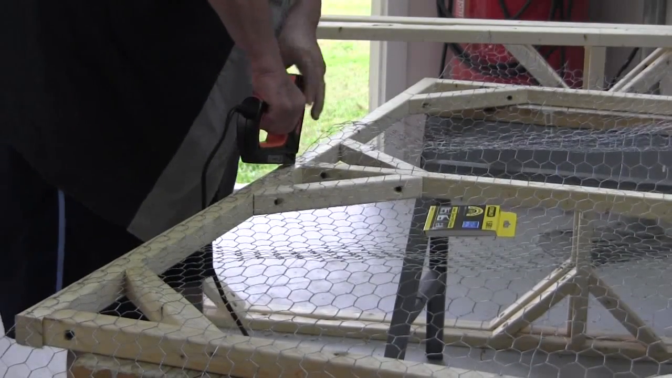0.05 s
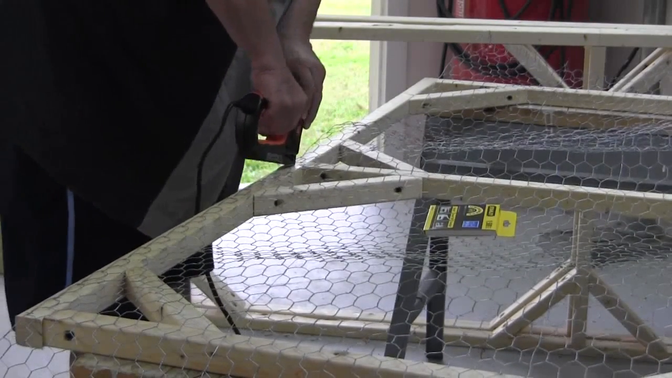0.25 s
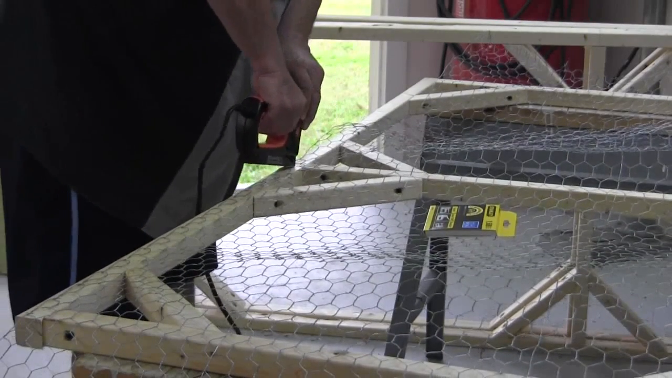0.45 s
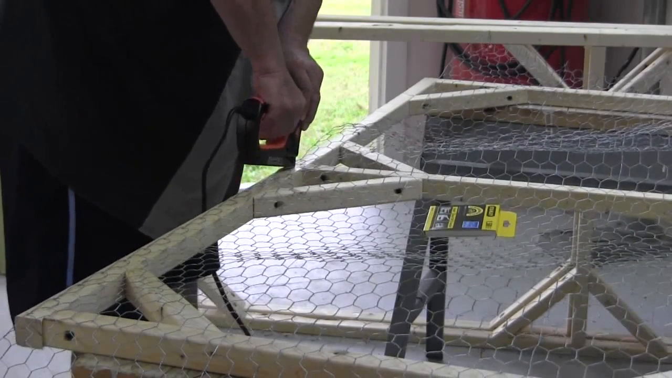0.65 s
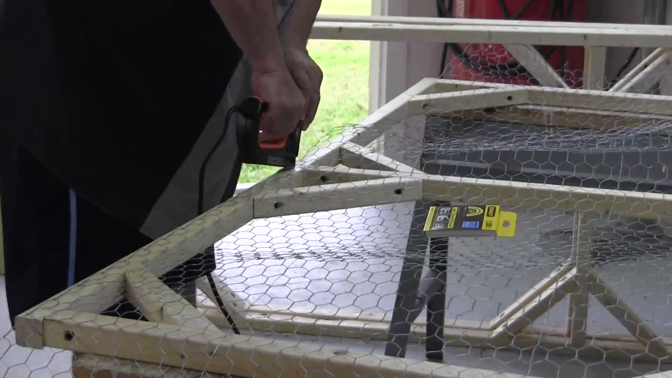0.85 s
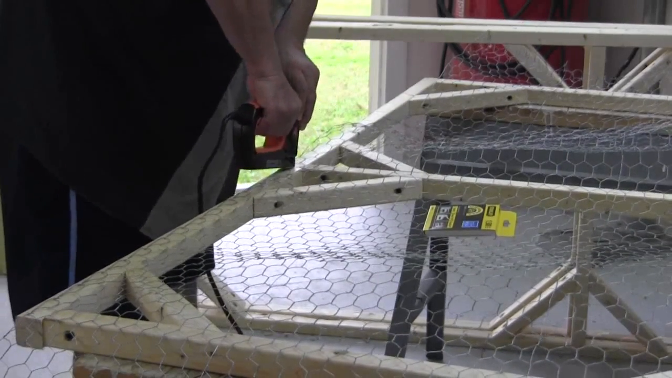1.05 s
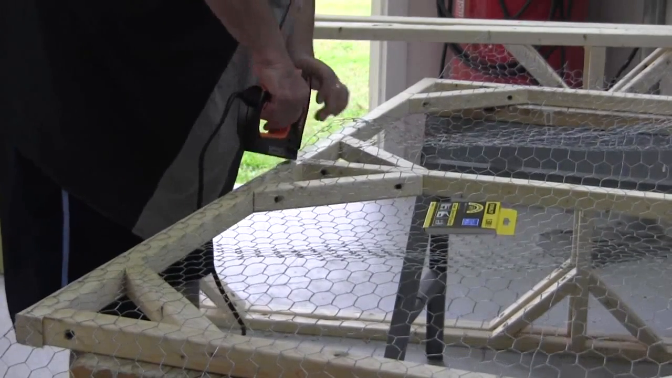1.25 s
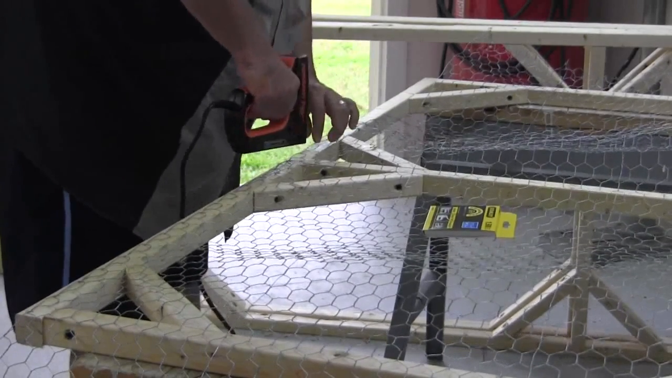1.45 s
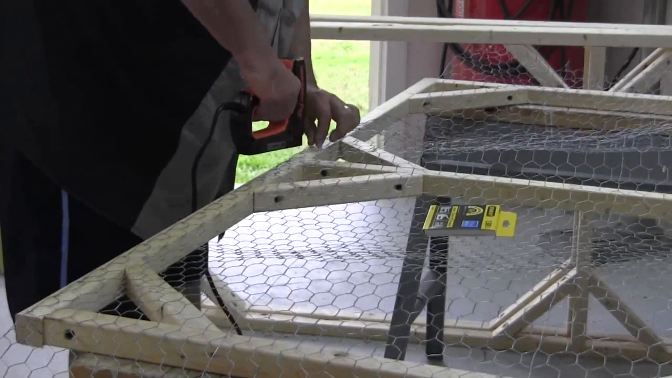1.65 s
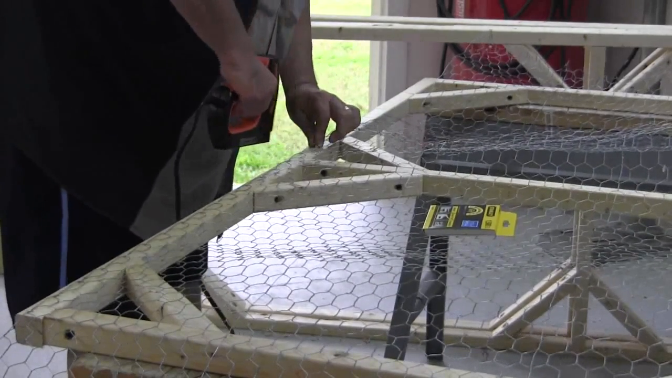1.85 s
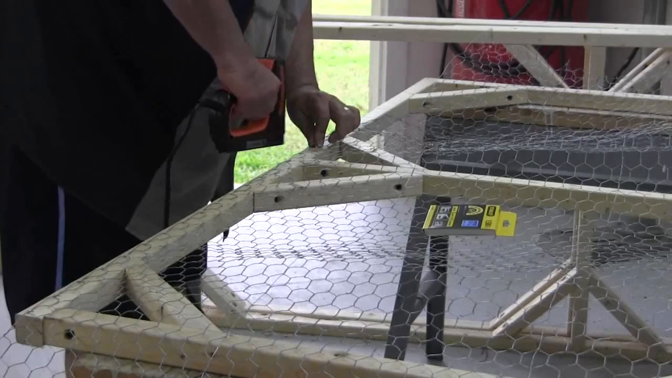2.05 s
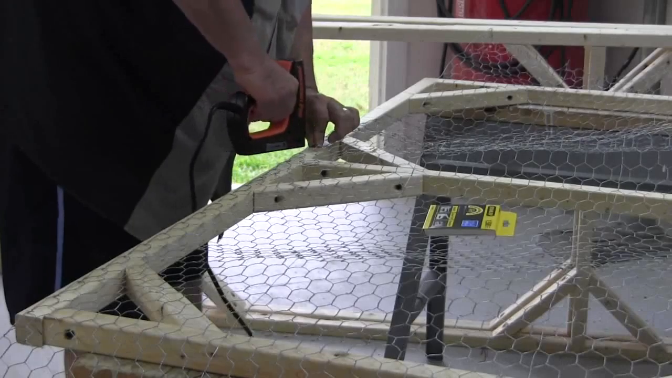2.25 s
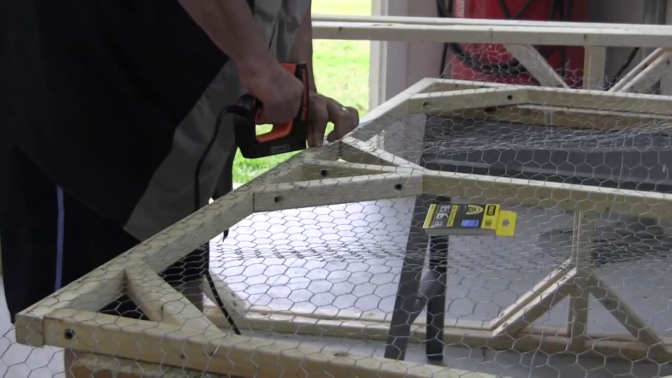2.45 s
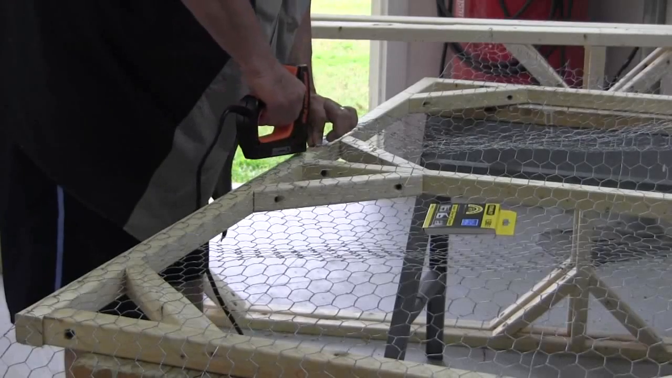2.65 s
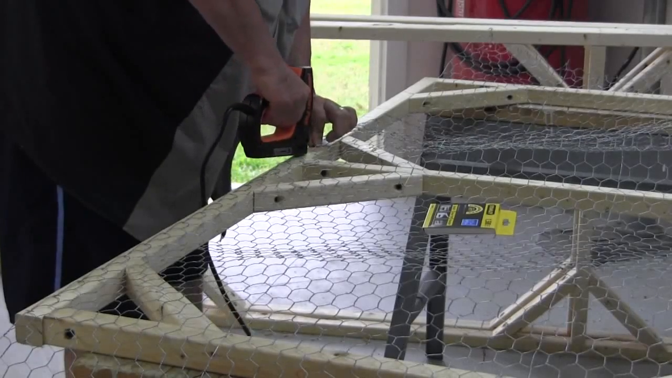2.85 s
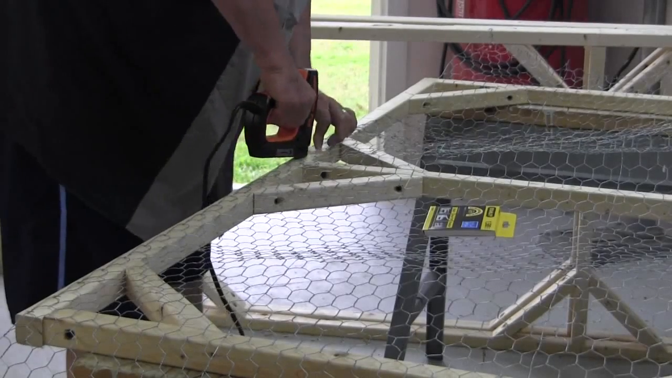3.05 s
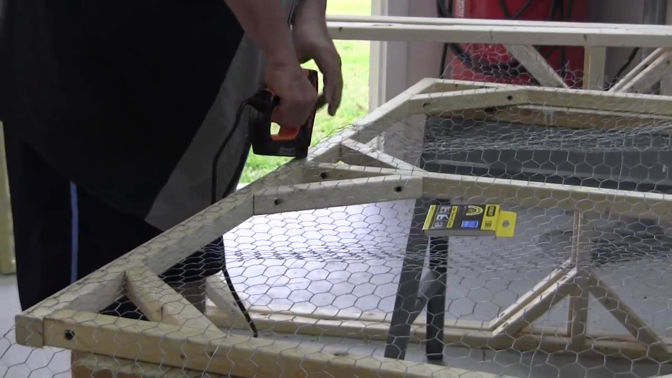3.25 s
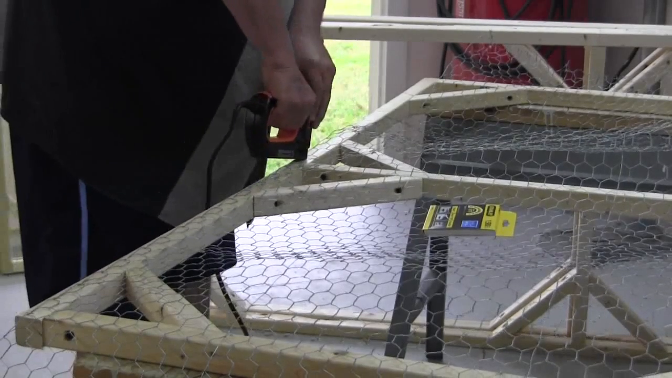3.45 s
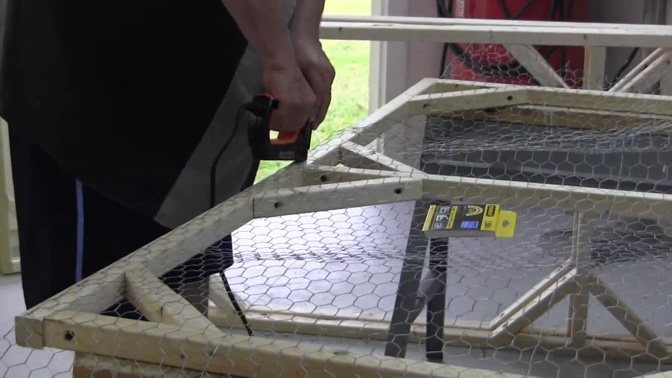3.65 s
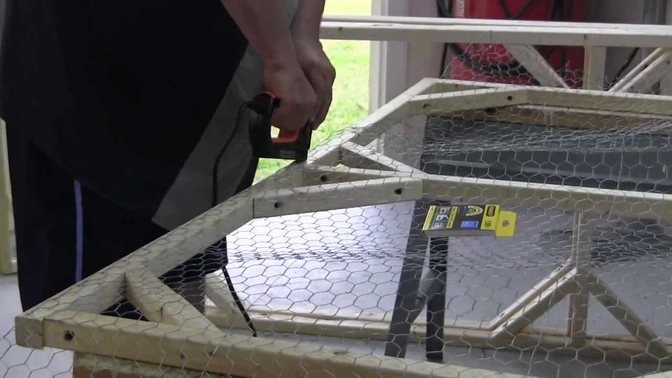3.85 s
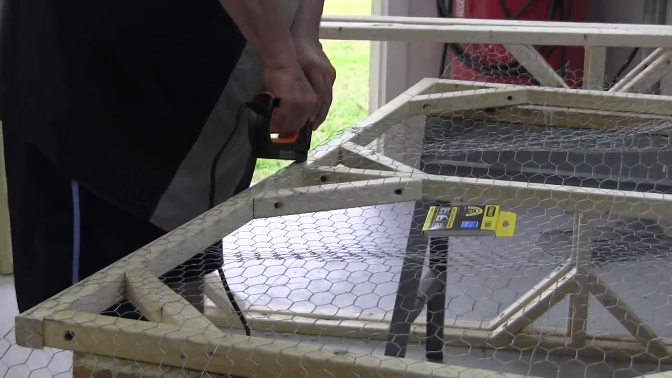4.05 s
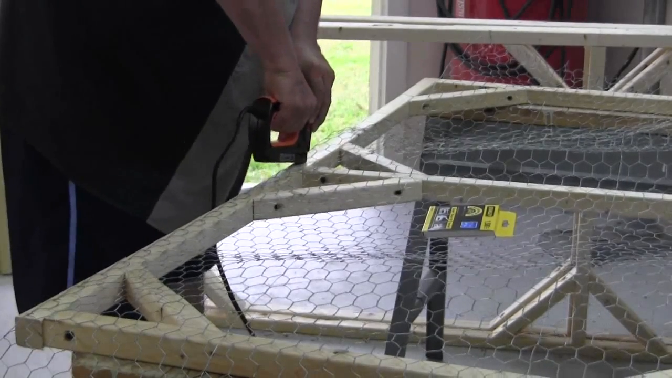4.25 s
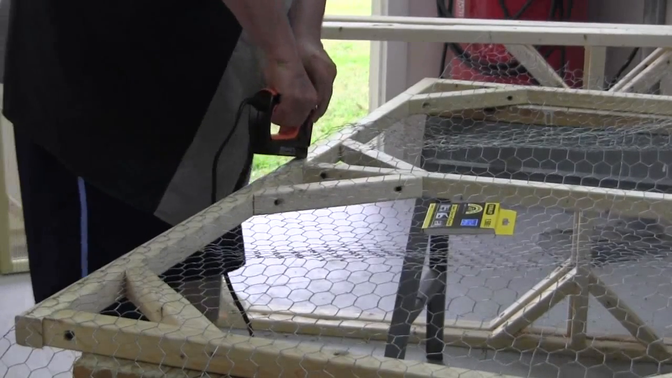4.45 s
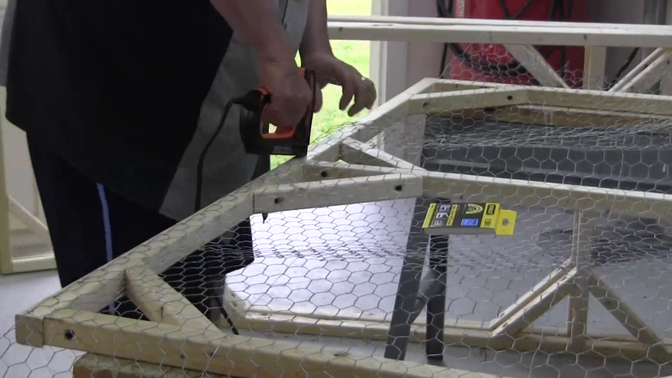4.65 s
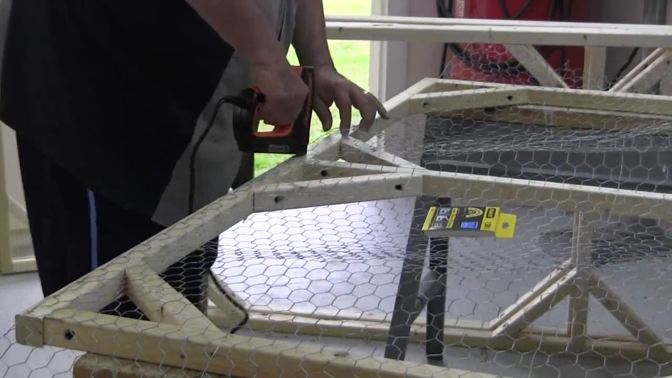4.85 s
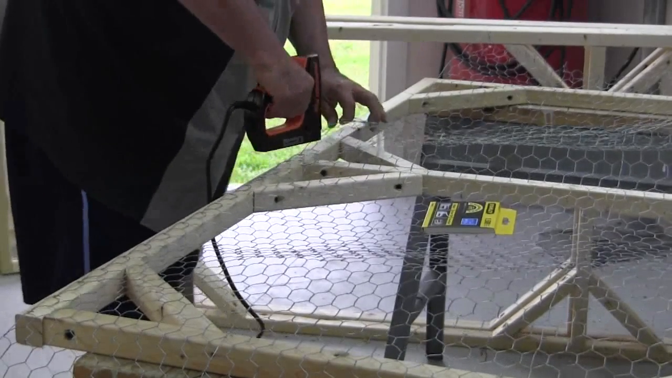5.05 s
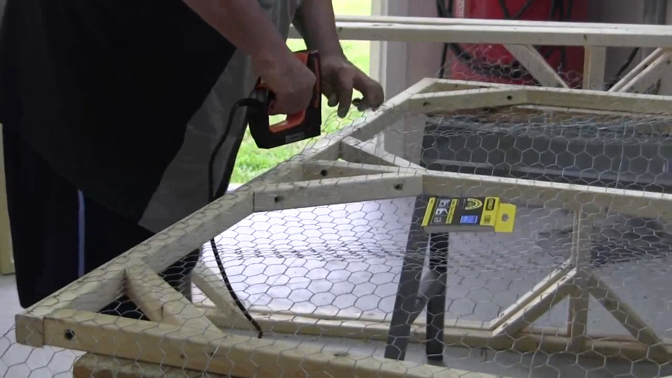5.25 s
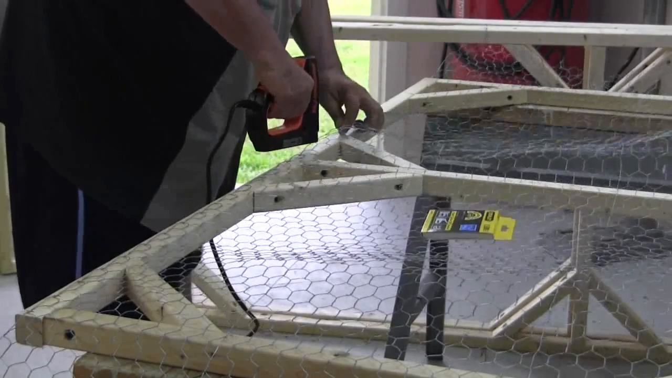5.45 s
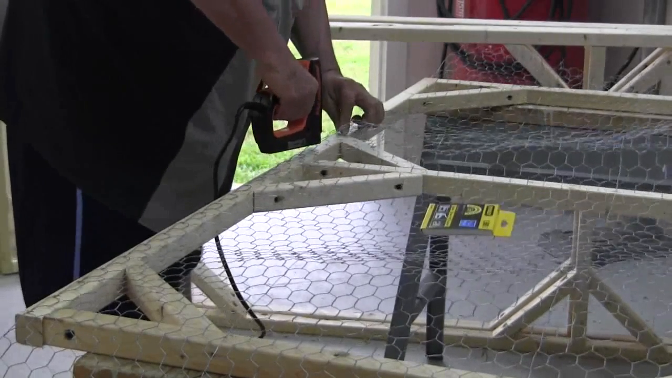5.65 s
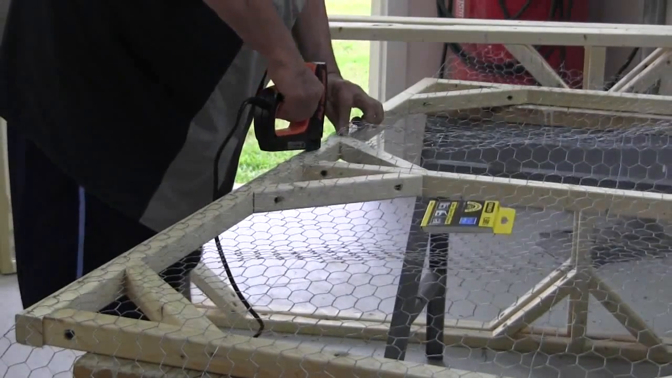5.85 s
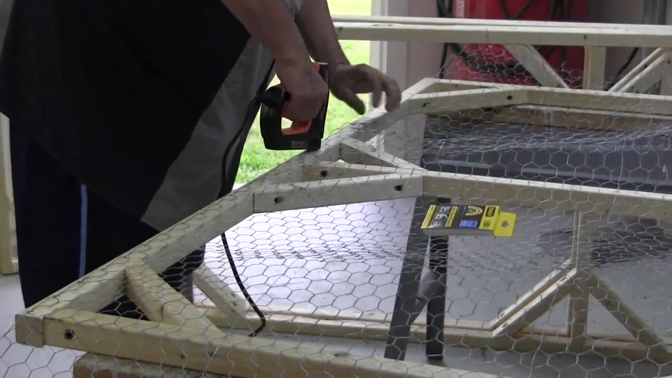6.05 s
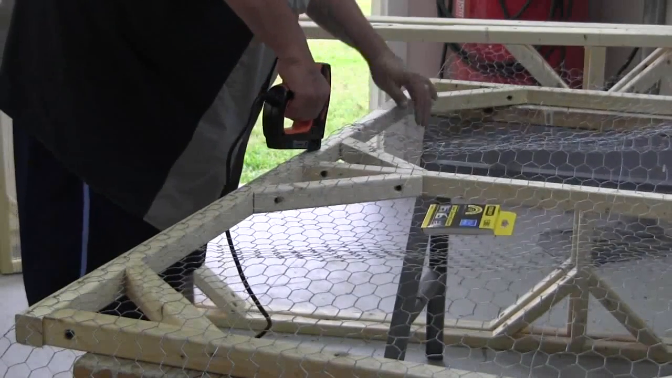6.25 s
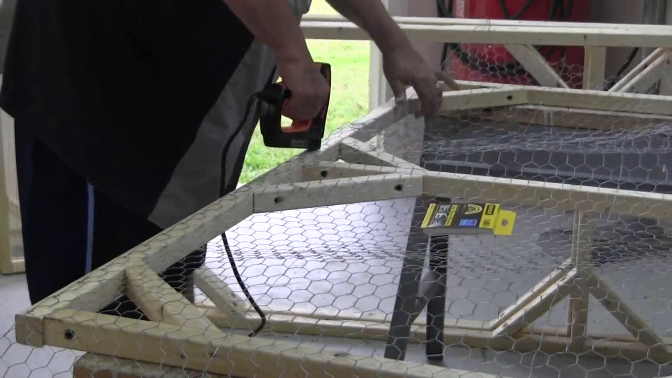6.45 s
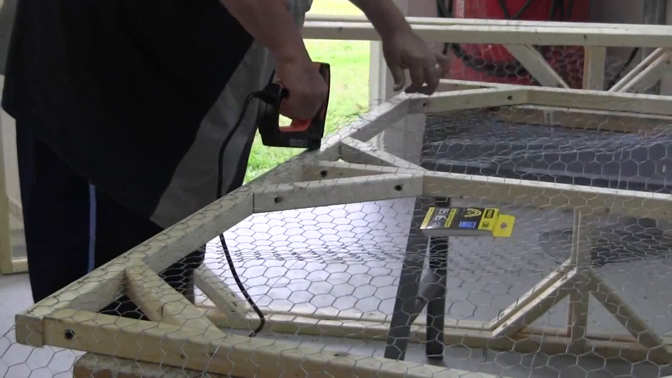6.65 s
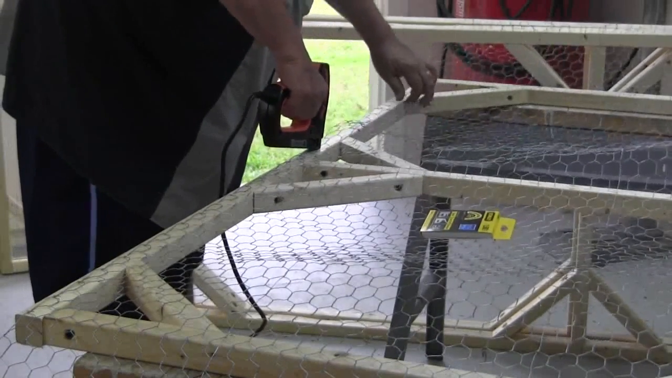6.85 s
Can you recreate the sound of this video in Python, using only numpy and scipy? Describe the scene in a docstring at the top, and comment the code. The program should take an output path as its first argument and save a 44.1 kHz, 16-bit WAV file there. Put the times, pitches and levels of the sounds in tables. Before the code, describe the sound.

Two loud staple gun shots ring through wood and wire mesh, with small handling knocks over a soft outdoor hush.

```python
"""A steady outdoor hush drifts into a hard-walled workshop, where hands tug at rustling wire mesh.
A trigger clicks and an electric staple gun fires through the mesh into a wooden frame, twice in all.
Each bang fills the room and sets frame and mesh ringing; a limiter holds its loudest part flat.
Around the shots the gun knocks on the wood and scrapes off the wire, and faint birds whistle far away."""
import sys
import numpy as np
from scipy import signal
from scipy.fft import rfft, irfft
from scipy.io import wavfile
from scipy.ndimage import uniform_filter1d

SR = 44100
rng = np.random.default_rng(int(sys.argv[2]) if len(sys.argv) > 2 else 0)


def output_pcm(signal):
    """Save a mono or channel-first signal as 16-bit PCM at the path in sys.argv[1].

    Samples are clipped to [-1, 1] before scaling.
    """
    pcm = np.clip(np.atleast_2d(signal).T, -1, 1) * 32767
    wavfile.write(sys.argv[1], SR, np.round(pcm).astype(np.int16))


N = 305172
TIME = np.arange(N) / SR


def amp(db):
    """Decibels to gain."""
    return 10 ** (np.asarray(db) / 20)


def unit(x):
    """Scales to rms 1."""
    return x / np.sqrt(np.mean(x ** 2) + 1e-20)


def curve_at(points, hz):
    """Reads a curve on a log-frequency axis."""
    freqs, values = np.transpose(points)
    return np.interp(np.log(hz + 1), np.log(freqs + 1), values)


def add(mix, start_s, sound):
    """Lays a sound into the mix."""
    part = mix[max(round(start_s * SR), 0):][:len(sound)]
    part += sound[:len(part)]


def colour(x, eq, tilt=0, edge_hz=None, keep_power=True, size=4096):
    """Minimum-phase EQ, with a tilt in dB per octave above 500 Hz and an optional treble roll-off."""
    hz = abs(np.fft.fftfreq(size, 1 / SR))
    gain = amp(curve_at(eq, hz) + tilt * np.log2(np.maximum(hz, 500) / 500))
    if edge_hz:
        gain = gain / np.sqrt(1 + (hz / edge_hz) ** 8)
    if keep_power:
        gain = unit(gain)
    log_gain = np.log(np.maximum(gain, 1e-5))
    taps = np.fft.ifft(np.exp(np.conj(signal.hilbert(log_gain)))).real
    return signal.oaconvolve(x, taps)[:len(x)]


# stereo width, narrow in the bass and opening in the treble: freq_hz, side_gain_db
WIDTH = [(30, -12), (80, -29), (170, -19.5), (350, -12), (1400, -14.5), (3000, -10.5), (6000, -7.5),
         (11000, -6), (15000, -8)]
def stereo(mid, side):
    """Left and right from the sound ahead and the weaker sound from the sides."""
    side = colour(side, WIDTH, keep_power=False)
    return np.array([mid + side, mid - side])


# bass-heavy air of the yard: freq_hz, gain_db
HUSH_EQ = [(15, -39), (25, -34), (38, -8.5), (64, -1), (169, -3), (253, -8), (289, -10.5), (331, -13),
           (368, -15), (648, -12.5), (919, -7), (2120, -14.5), (2700, -17), (3720, -26), (15500, -40)]
def hush(level_db=-48, side_db=1):
    """A steady bed of distant outdoor noise."""
    mid, side = (colour(rng.standard_normal(N), HUSH_EQ) for _ in range(2))
    return amp(level_db) * stereo(mid, amp(side_db) * side)


def pull(peak_s, db, rise_db_per_s, fall_db_per_s):
    """Strength of one sliding movement: it builds to a peak and lets go."""
    return amp(db - np.maximum(rise_db_per_s * (peak_s - TIME), fall_db_per_s * (TIME - peak_s)))


def slips(strength, per_s, spread_db):
    """Friction: many tiny slips of uneven size, as strong as the movement."""
    sizes = amp(spread_db * np.minimum(rng.exponential(1, N), 4)) * rng.choice([-1, 1], N)
    slipping = rng.random(N) < per_s / SR
    return strength * unit(sizes * slipping)


# bright tick of wire and gun parts, also heard in the clicks: freq_hz, gain_db
TICK_EQ = [(100, -20), (400, -5), (900, -4.5), (1500, 3), (2200, -6), (3100, -4), (4600, -11),
           (7000, -13.5), (10000, -17), (16000, -24)]
# dull body of the wood, also heard in the knocks: freq_hz, gain_db
WOOD_EQ = [(25, -34), (60, -1.5), (120, -6), (220, -1), (300, -9), (450, -5.5), (700, -6.5), (1500, -9),
           (4000, -24)]
# tugs that slide the mesh under hand and gun: peak_s, level_db
TUGS = [(0, -51.5), (.36, -52.5), (3.68, -49), (4.17, -61), (5.39, -51.5), (5.58, -47.5), (6.47, -56),
        (6.85, -44)]
def wire_tugs(rustle_db=-5, snag_db=-13, rub_db=-3):
    """Pulled mesh rustles, snags and rubs on the wood."""
    pulls = [pull(peak_s, db, rise_db_per_s=46, fall_db_per_s=80) for peak_s, db in TUGS]
    strength = np.linalg.norm(pulls, axis=0)
    rustle = colour(slips(strength, per_s=700, spread_db=4), TICK_EQ, tilt=.2)
    snags = colour(slips(strength, per_s=30, spread_db=2.5), TICK_EQ, tilt=1.0)
    rub = colour(slips(strength, per_s=1200, spread_db=0.5), WOOD_EQ, edge_hz=700)
    return amp(rustle_db) * rustle + amp(snag_db) * snags + amp(rub_db) * rub


def rattle(envelope, passes=12):
    """Noise under an envelope, its energy spread evenly over all pitches."""
    noise = envelope * rng.standard_normal(len(envelope))
    for _ in range(passes):
        whitened = irfft(np.exp(1j * np.angle(rfft(noise))), len(noise))
        noise = envelope * np.sign(whitened)
    return noise


def contact(decay_s, pitch_hz, note_db=2, size=8192):
    """A small blow: a rattle that dies away, with one note of the struck part standing out."""
    burst = rattle(np.exp(-TIME[:size] / decay_s))
    note = signal.lfilter(*signal.iirpeak(pitch_hz, Q=4, fs=SR), burst)
    return burst + amp(note_db) * note


# clicks of trigger, gun nose and wire: start_s, level_db, pitch_hz, decay_s
CLICKS = [(1.165, -42, 3200, .006), (2.93, -42.5, 4540, 0.018), (3.595, -38.5, 2570, 0.0063),
          (4.428, -44, 7000, 0.0093), (4.7453, -24, 12000, 0.0085), (4.952, -24, 1650, .0053),
          (5.061, -38, 12000, .0035), (5.311, -43, 3140, 0.021), (5.418, -45.5, 7200, .0095),
          (5.5, -44.5, 3000, .012), (5.595, -42, 2980, 0.015), (6.001, -43, 6000, .004),
          (6.213, -33, 6900, 0.02), (6.716, -40.5, 2470, 0.018)]
def clicks(base_tilt=-2.1, tilt_per_octave=2.5, pivot_hz=4500):
    """Hard contacts of metal, plastic and wire: smaller, higher parts click brighter."""
    out = np.zeros(N)
    for start_s, db, pitch_hz, decay_s in CLICKS:
        tilt = base_tilt + tilt_per_octave * np.log2(pitch_hz / pivot_hz)
        add(out, start_s, amp(db) * colour(contact(decay_s, pitch_hz), TICK_EQ, tilt))
    return out


# the shots and the ring each leaves: start_s, level_db, frame_db, mesh_db, tilt_db_per_octave
SHOTS = [(1.1987, 10.5, -8, -30, -0.5), (4.4483, 12, -6.5, -28.5, -0.5)]
# blows within a shot, timed from the driver meeting the staple: offset_s, level_db, decay_s
STROKE = [(-.003, -33, 0.0027), (0, -7, 0.0034), (.0042, -1.5, 0.004), (.014, -12, .014)]
# broad, hard tone of the bang: freq_hz, gain_db
BANG_EQ = [(25, -70), (60, -7), (140, -1.5), (280, -7.5), (500, 2), (800, -1), (1300, -2), (2000, -6),
           (2800, -3), (4200, -10), (6000, -10.5), (9000, -13.5), (13500, -14), (16000, -22)]
def staple_gun(low_cut_hz=450, crack_tilt=0.73, size=8192):
    """A solenoid's driver shears off a staple and slams it home: a close crack, a bang for the room."""
    first_blow_s, hardest_blow_s = STROKE[0][0], STROKE[2][0]
    t = TIME[:size] + first_blow_s
    blows = [(t >= at_s) * amp(db) * np.exp(-abs(t - at_s) / decay_s) for at_s, db, decay_s in STROKE]
    envelope = np.linalg.norm(blows, axis=0)
    slam = np.linalg.norm(envelope) * signal.unit_impulse(size)  # the whole stroke's energy in one pulse
    crack, bang = np.zeros(N), np.zeros(N)
    for start_s, db, _, _, tilt in SHOTS:
        add(crack, start_s + first_blow_s, amp(db) * colour(rattle(envelope), BANG_EQ, tilt + crack_tilt))
        add(bang, start_s + hardest_blow_s, amp(db) * colour(slam, BANG_EQ, tilt))
    low_cut = signal.butter(2, low_cut_hz, "high", fs=SR, output="sos")  # a small gun radiates little bass
    return signal.sosfilt(low_cut, crack), bang


# ringing notes of the wooden frame: pitch_hz, level_db, t60_s
FRAME_MODES = [(146.9, -8.5, 0.86), (202.7, -2, 0.53), (286, -13.5, 1.19), (356.7, -2, 0.72),
               (418, -6, 1.11), (426, -24, 1.9), (472, 1.5, 0.62), (559, 1.5, 0.53), (824, 1, 0.55),
               (1043, -18, 0.46), (1205, -5.5, 0.6)]
def frame_boom(swell_s=0.035):
    """Each shot sets the frame booming: its modes bloom, then die away."""
    t, boom = TIME[:2 * SR], np.zeros(N)
    swell = 1 - np.exp(-t / swell_s)
    for start_s, _, frame_db, _, _ in SHOTS:
        for pitch_hz, db, t60_s in FRAME_MODES:
            mode = amp(db - 60 * t / t60_s) * np.sin(2 * np.pi * (pitch_hz * t + rng.random()))
            add(boom, start_s, amp(frame_db) * mode * swell)
    return boom


# ring of the wire mesh: freq_hz, gain_db
MESH_EQ = [(150, -9.5), (420, 16), (1000, 5), (2800, 0), (5000, -4.5), (9000, -9), (13000, -12.5),
           (16000, -24)]
def mesh_shimmer(t60_s=1.9):
    """Each shot leaves the mesh shimmering, a fading wash of noise."""
    t, envelope = TIME[:2 * SR], np.zeros(N)
    for start_s, _, _, mesh_db, _ in SHOTS:
        add(envelope, start_s, amp(mesh_db - 60 * t / t60_s))
    mid, side = (envelope * colour(rng.standard_normal(N), MESH_EQ) for _ in range(2))
    return stereo(mid, side)


# dull knocks of gun and hand on the frame: start_s, level_db, edge_hz, decay_s
KNOCKS = [(1.404, -15.5, 1600, .011), (1.44, -22.5, 300, .012), (3.595, -32.5, 2600, 0.0074),
          (3.65, -44.5, 700, 0.022), (4.748, -14, 870, .004), (4.805, -18, 860, .009),
          (4.84, -23, 506, 0.0072), (5.062, -30.5, 870, 0.014), (5.09, -32.5, 573, 0.017),
          (5.57, -45, 503, 0.026), (6.003, -35.5, 520, 0.034), (6.056, -31, 487, 0.01),
          (6.785, -37.5, 1260, 0.019), (6.81, -37, 1100, 0.019)]
def knocks(pitch_to_edge=0.493):
    """Soft blows reach only the low notes of the wood; a harder contact has a higher treble edge."""
    out = np.zeros(N)
    for start_s, db, edge_hz, decay_s in KNOCKS:
        blow = contact(decay_s, pitch_to_edge * edge_hz)
        add(out, start_s, amp(db) * colour(blow, WOOD_EQ, edge_hz=edge_hz))
    return out


# far-off bird calls: start_s, length_s, pitch_hz, level_db
BIRDS = [(2.21, .17, 2670, -65), (2.42, .2, 2670, -62), (3.25, .26, 6120, -71), (5.12, .2, 6300, -72),
         (6.45, .25, 6140, -72)]
def birds(glide_share_per_s=0.045, quaver_share=.005):
    """Thin whistles that creep up in pitch with a slight quaver."""
    out = np.zeros(N)
    for start_s, length_s, pitch_hz, db in BIRDS:
        count = int(length_s * SR)
        quaver = unit(uniform_filter1d(rng.standard_normal(count), size=300))
        hz = pitch_hz * (1 + glide_share_per_s * TIME[:count] + quaver_share * quaver)
        whistle = np.sin(2 * np.pi * np.cumsum(hz) / SR)
        add(out, start_s, amp(db) * whistle * signal.windows.tukey(count, .5))
    return out


# resonances of the scraped wire: pitch_hz, bandwidth_hz, level_db
SQUEAL_MODES = [(816, 280, -3), (1286, 69, -0.5), (1640, 1460, -6), (2620, 330, -8)]
def wire_squeal():
    """The gun's nose catches on the wire and slides free; the friction rings a brief squeal."""
    scrape = pull(peak_s=4.912, db=-34.5, rise_db_per_s=1097.5, fall_db_per_s=192.5)
    drag = slips(scrape, per_s=970, spread_db=4)
    t, squeal = TIME[:8192], np.zeros(N)
    for pitch_hz, bandwidth_hz, db in SQUEAL_MODES:
        mode = np.exp(-np.pi * bandwidth_hz * t) * np.sin(2 * np.pi * pitch_hz * t)
        squeal += amp(db) * signal.oaconvolve(drag, mode / np.linalg.norm(mode))[:N]
    return squeal


# how long the hard walls ring: freq_hz, t60_s
ROOM_DECAY = [(80, 0.8), (250, 0.6563), (700, 0.5271), (2000, 0.6215), (5000, 0.4588), (13000, 0.5542)]
# tone of the reverb: freq_hz, gain_db
ROOM_EQ = [(60, -2), (400, 7), (2000, 4), (6000, 5.5), (14000, -8)]
def room_tail(build_cycles=5):
    """Dense reflections, each band building and dying at its own speed."""
    t = TIME[:2 * SR]
    hz, spectrum = np.fft.rfftfreq(len(t), 1 / SR), rfft(rng.standard_normal(len(t)))
    centres, tail = np.transpose(ROOM_DECAY)[0], np.zeros(len(t))
    for (centre_hz, t60_s), share in zip(ROOM_DECAY, np.eye(len(centres))):
        band = irfft(spectrum * curve_at(np.c_[centres, share], hz))
        build = 1 - np.exp(-t * centre_hz / build_cycles)  # bass takes longer to fill the room
        tail += band * build * amp(-60 * t / t60_s)
    return colour(tail / np.linalg.norm(tail), ROOM_EQ, keep_power=False)


def workshop(direct, send):
    """The direct sound from ahead and the room's reverb from all round."""
    mid, side = (signal.fftconvolve(send, room_tail())[:N] for _ in range(2))
    return stereo(direct + mid, side)


def scene(left_db=-0.38, knock_send_db=-4, click_db=-2):
    """The stapling in the workshop over the outdoor bed, all a touch to the right."""
    crack, bang = staple_gun()
    thuds = knocks()
    details = amp(click_db) * clicks() + wire_tugs() + wire_squeal() + birds()
    room = workshop(direct=crack + thuds + details, send=bang + amp(knock_send_db) * thuds + details)
    return (room + frame_boom() + mesh_shimmer() + hush()) * amp([[left_db], [0]])


def limit(x, threshold_db, window_s, attack_s, release_db_per_s):
    """Turns the gain down by as much as the smoothed power exceeds the threshold."""
    power = uniform_filter1d((x ** 2).mean(0), int(window_s * SR))
    over_db = np.maximum(10 * np.log10(abs(power) + 1e-12) - threshold_db, 0)
    recovery_db = release_db_per_s * TIME
    held_db = np.maximum.accumulate(over_db + recovery_db) - recovery_db
    pole = np.exp(-1 / (attack_s * SR))
    return x / amp(signal.lfilter([1 - pole], [1, -pole], held_db))


def record(dry, ceiling=.85, high_cut_hz=15800):
    """A leveller flattens the bangs, a fast limiter and soft clip catch the crack; then a high cut."""
    levelled = limit(dry, threshold_db=-14.5, window_s=0.03, attack_s=0.012, release_db_per_s=200)
    caught = limit(levelled, threshold_db=-8.5, window_s=0.00054, attack_s=.0001, release_db_per_s=2503)
    rounded = caught / (1 + (caught / ceiling) ** 6) ** (1 / 6)
    low_pass = signal.firwin(511, high_cut_hz, window=("kaiser", 9), fs=SR)
    return signal.oaconvolve(rounded, low_pass[None], "same")


dry = scene()
out = record(dry)
output_pcm(out)
```